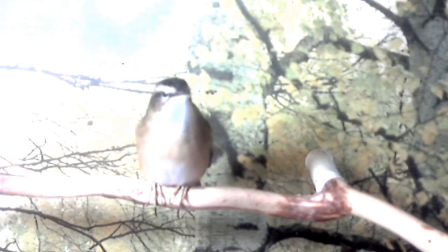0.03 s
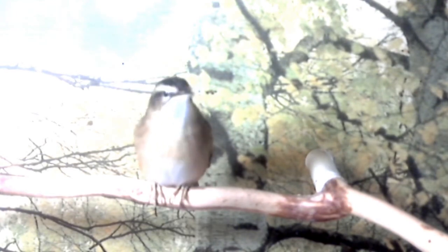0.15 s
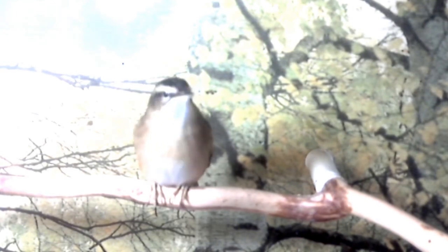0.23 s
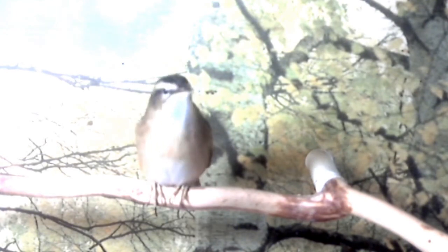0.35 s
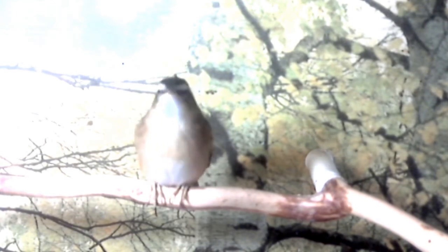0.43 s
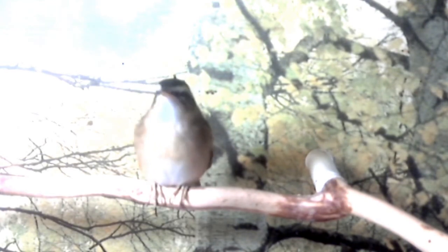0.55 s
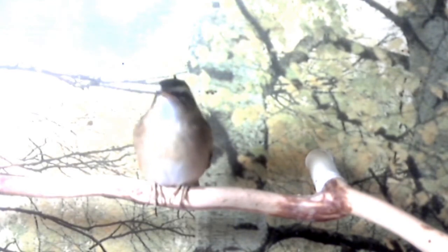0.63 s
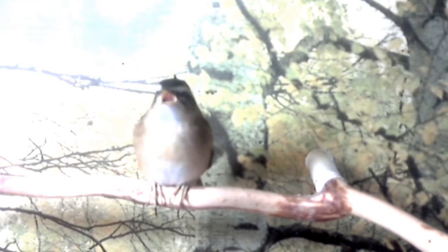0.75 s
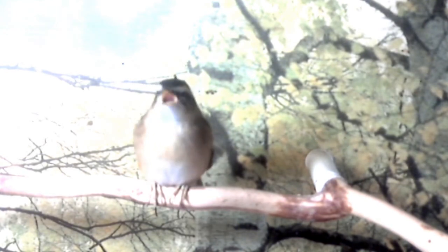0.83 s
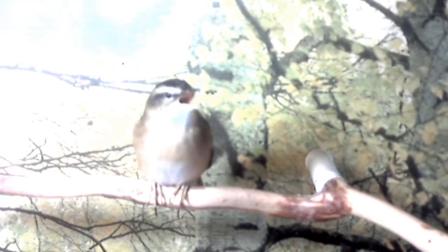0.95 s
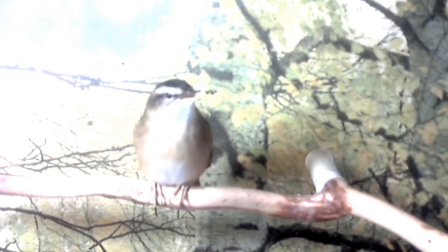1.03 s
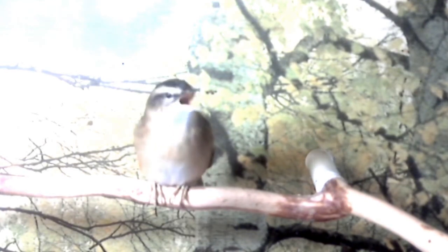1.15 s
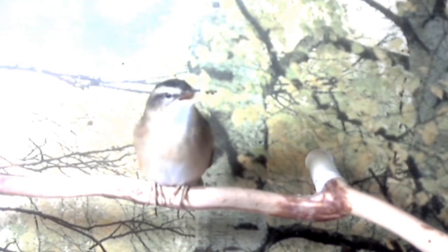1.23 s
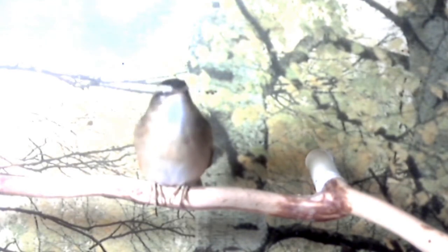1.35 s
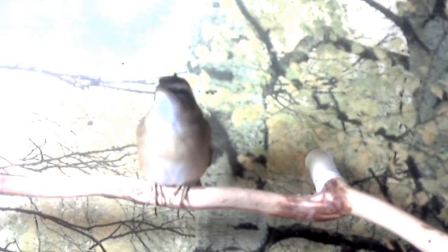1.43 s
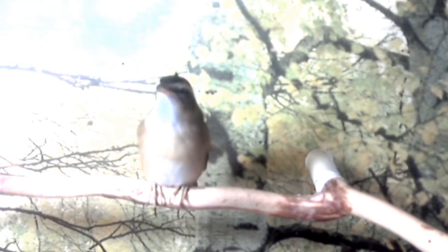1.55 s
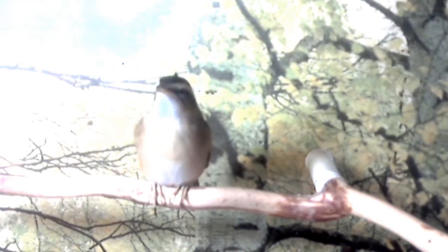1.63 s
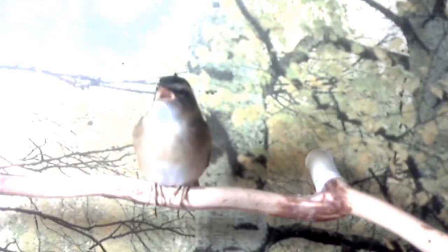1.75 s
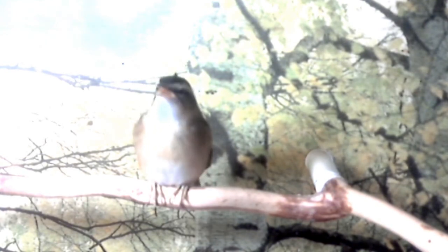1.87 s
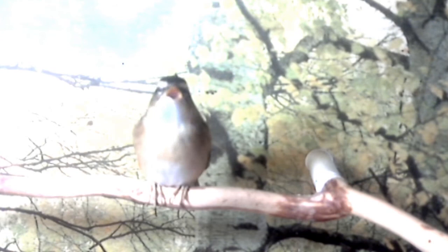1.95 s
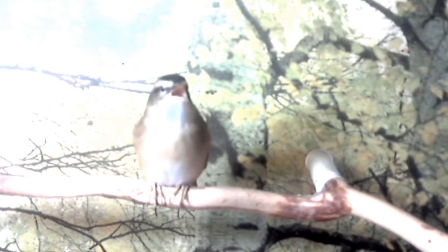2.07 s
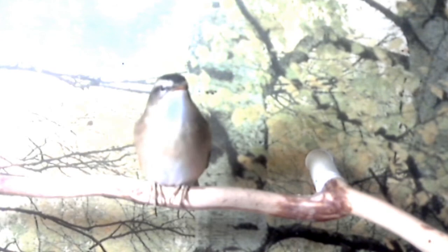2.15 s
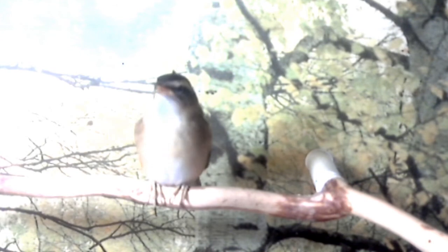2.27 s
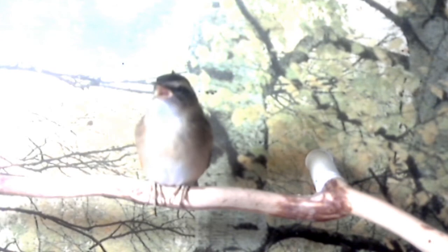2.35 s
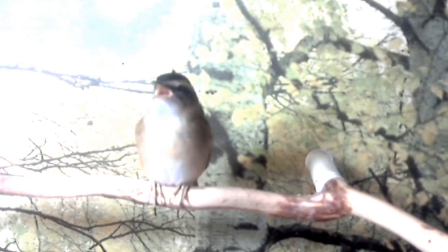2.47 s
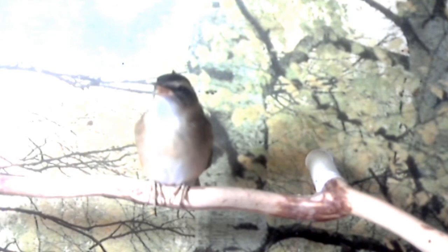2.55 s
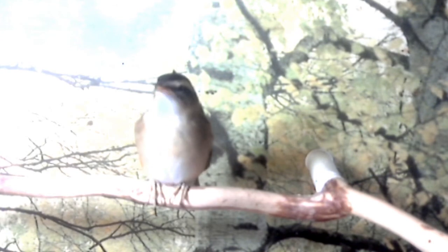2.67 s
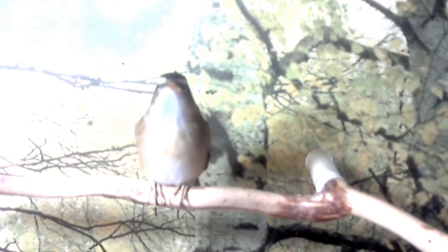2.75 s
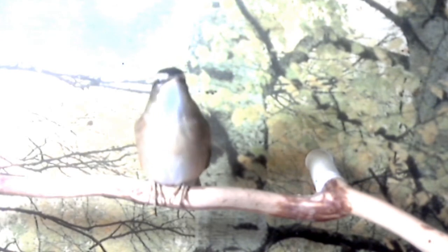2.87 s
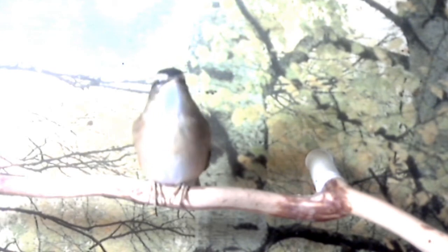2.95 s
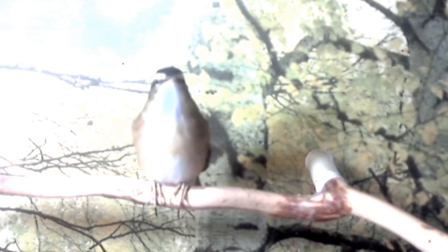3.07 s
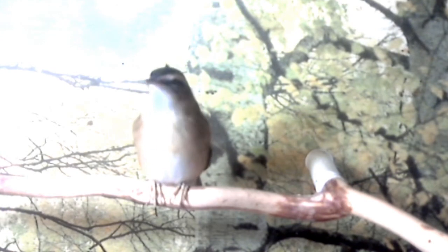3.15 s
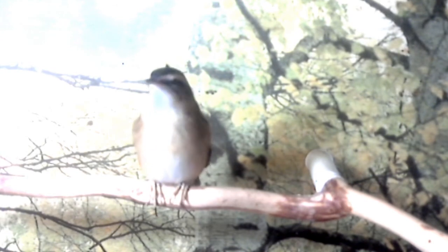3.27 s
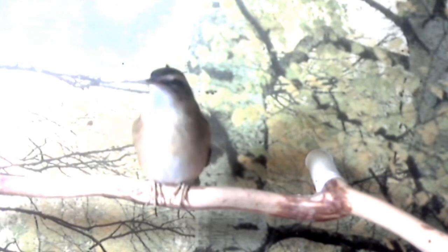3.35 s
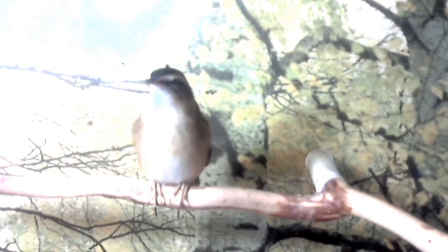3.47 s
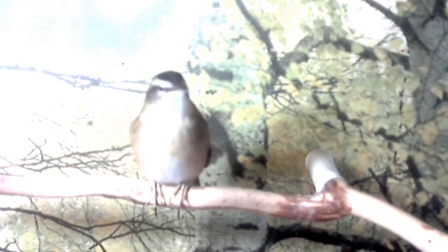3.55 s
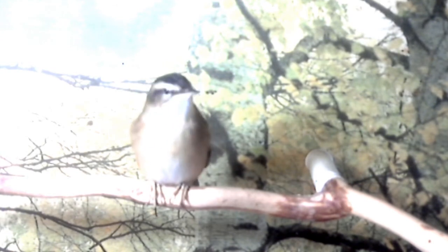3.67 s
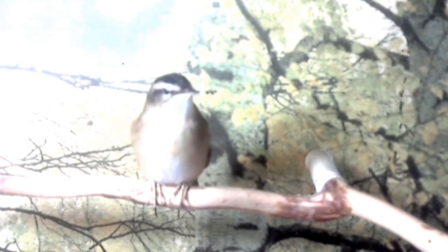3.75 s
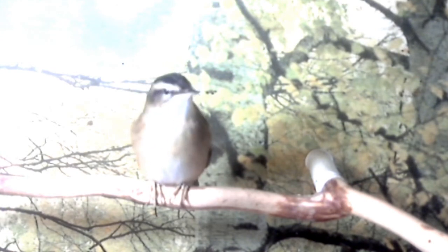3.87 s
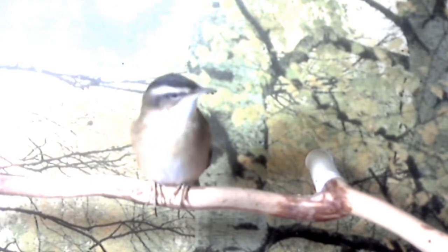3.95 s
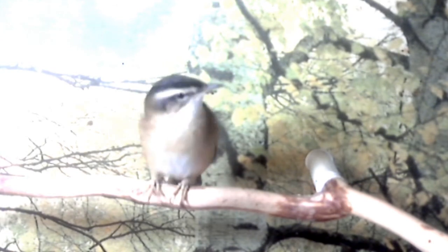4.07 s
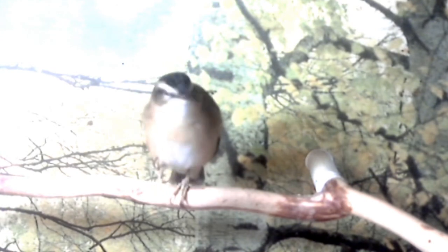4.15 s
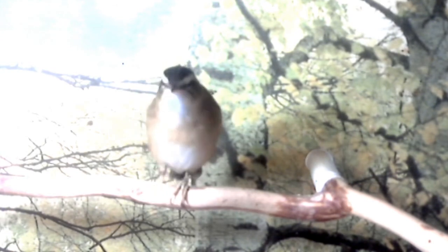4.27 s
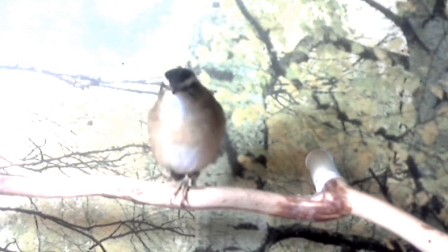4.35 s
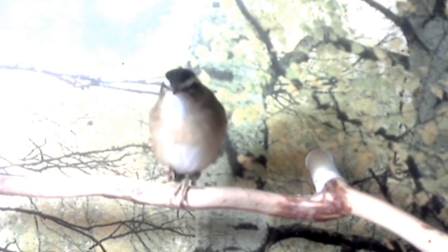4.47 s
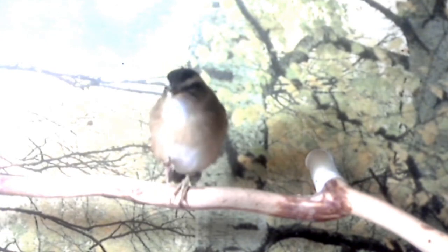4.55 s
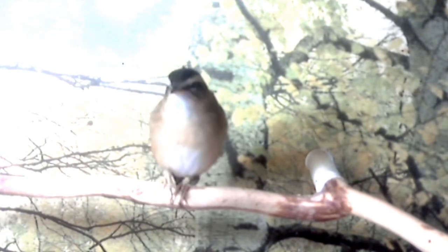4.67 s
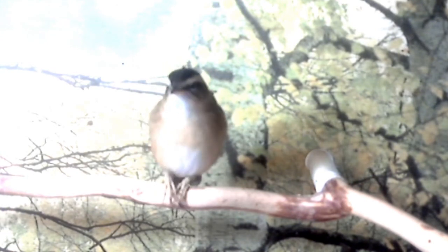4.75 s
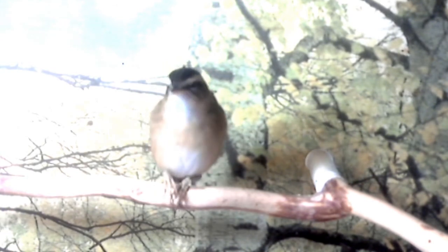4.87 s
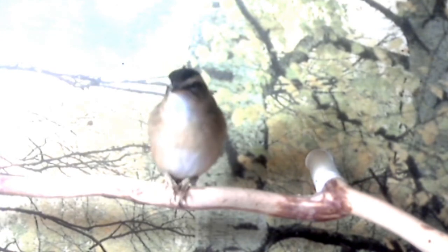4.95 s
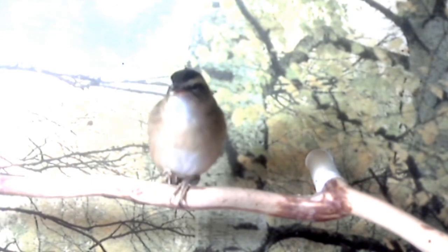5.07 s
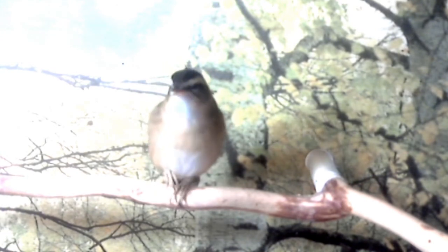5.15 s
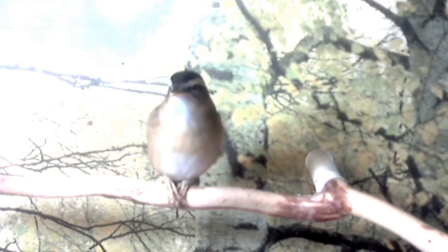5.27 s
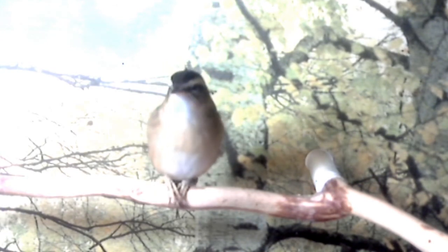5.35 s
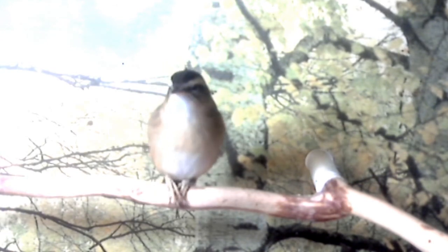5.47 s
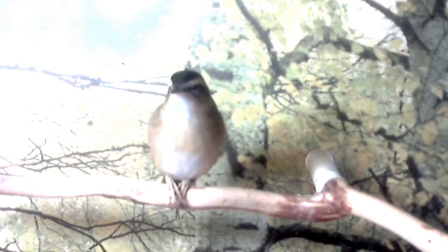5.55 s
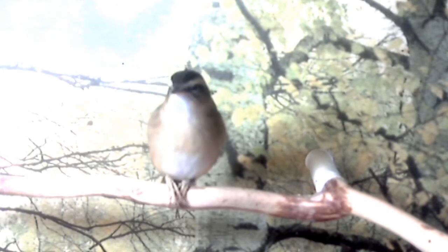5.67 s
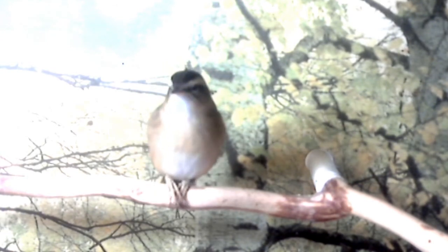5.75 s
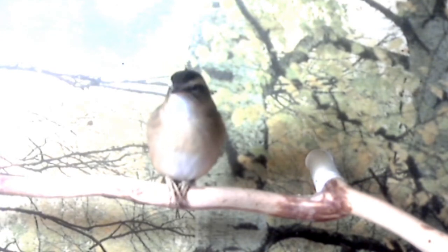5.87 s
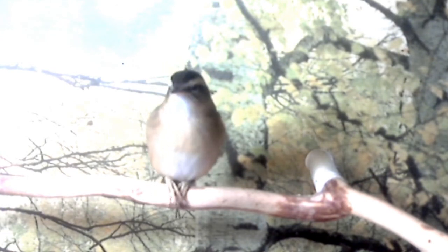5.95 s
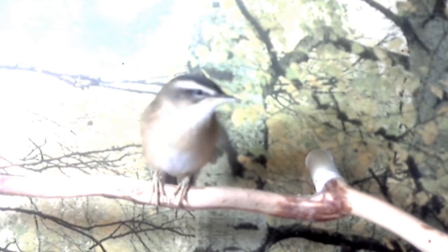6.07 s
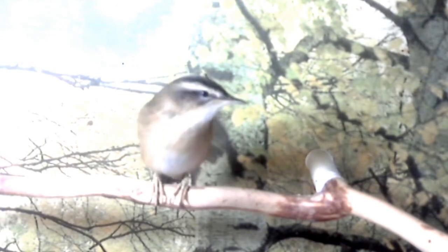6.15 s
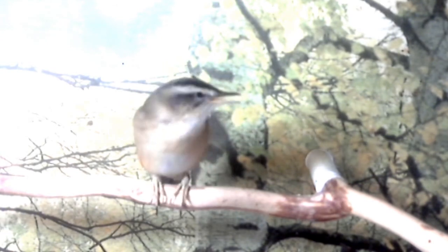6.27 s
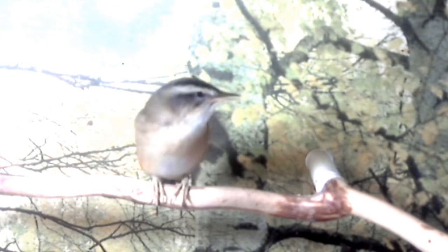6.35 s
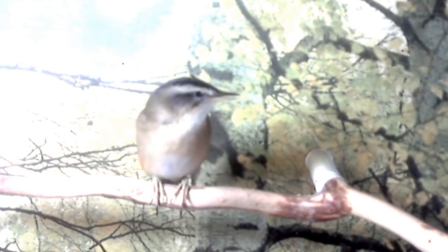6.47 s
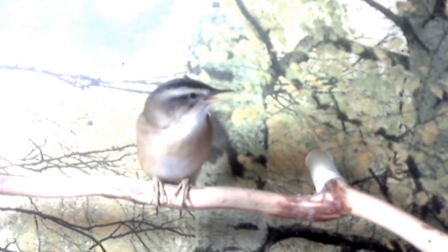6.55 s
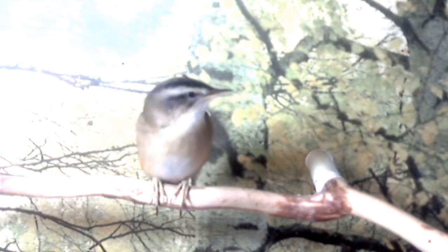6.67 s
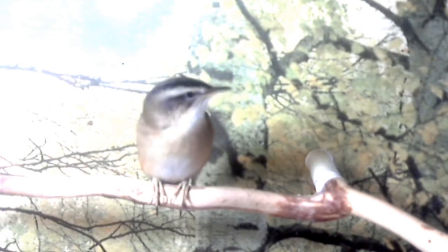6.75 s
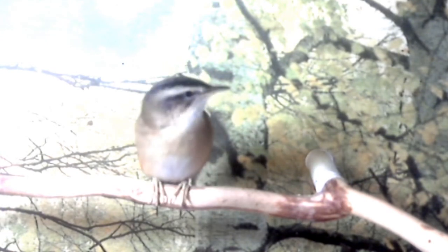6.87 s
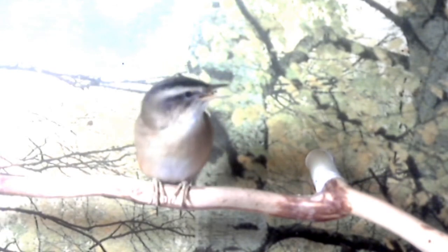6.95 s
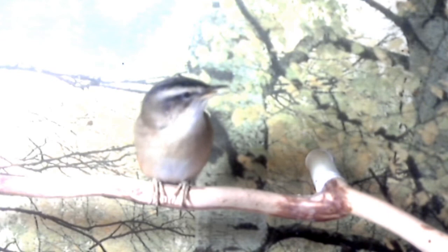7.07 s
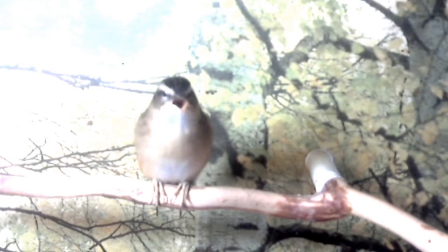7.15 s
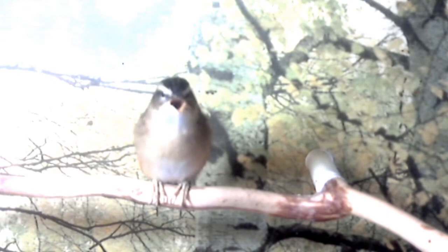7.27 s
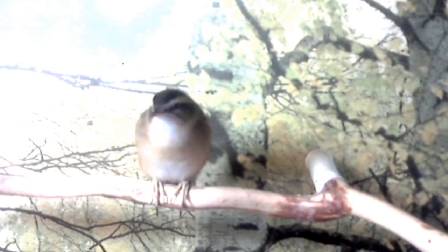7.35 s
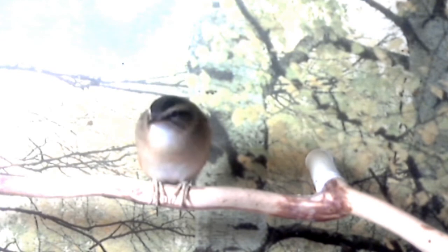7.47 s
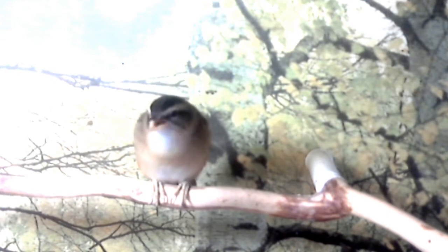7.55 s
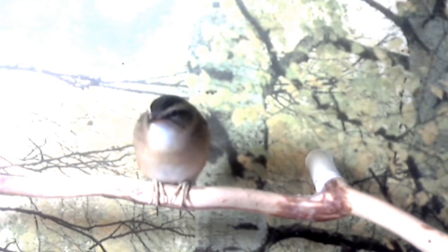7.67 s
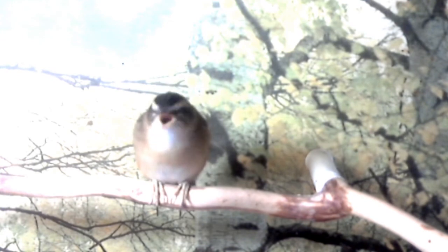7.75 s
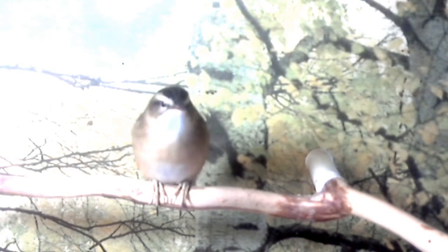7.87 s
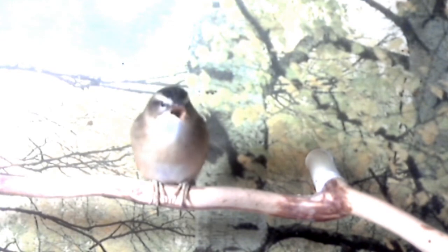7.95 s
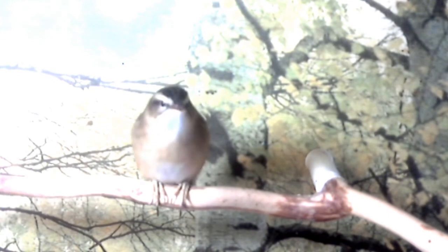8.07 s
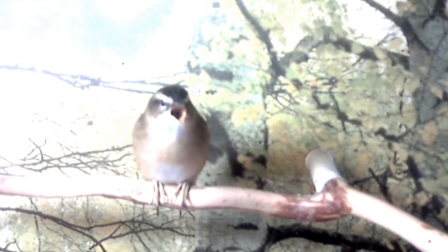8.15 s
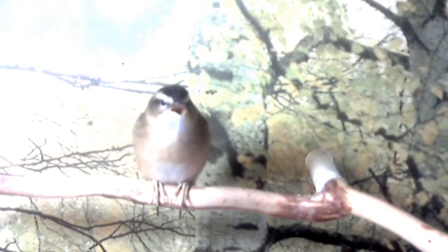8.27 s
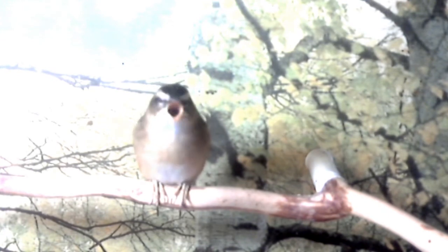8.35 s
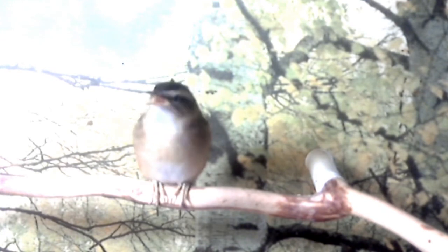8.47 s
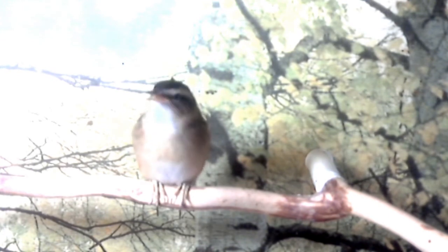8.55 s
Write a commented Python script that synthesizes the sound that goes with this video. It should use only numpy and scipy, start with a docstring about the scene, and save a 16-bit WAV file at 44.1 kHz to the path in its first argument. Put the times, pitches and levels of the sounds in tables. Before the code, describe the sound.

Close song of a warbler: fast clusters of scratchy chips, a few buzzes, loud chirps and faint whistles over quiet air.

```python
"""On a branch close to a microphone, a sedge warbler sings: clusters of short chips, three rasping
buzzes and five loud two-voiced chirps, with faint whistles, ringing tails and husky notes between them.
Its syrinx gives rough tones; windpipe and beak weight the harmonics of the chips, each in a short halo of
hiss. Foliage scatters the song for a moment, a quiet hum and air noise lie under it, and the loudest
notes overload the recorder."""
import sys
import numpy as np
from scipy import signal
from scipy.fft import rfft, irfft
from scipy.io import wavfile

SR = 44100
rng = np.random.default_rng(int(sys.argv[2]) if len(sys.argv) > 2 else 0)


def digitize_waveform(pressure):
    """Quantize a signal to 16-bit integers and store it at the path in sys.argv[1].

    Rows of a 2-D input are taken as channels; values are limited to [-1, 1].
    """
    field = np.atleast_2d(pressure).T
    bounded = np.clip(field, -1, 1)
    quanta = np.round(bounded * 32767).astype(np.int16)
    wavfile.write(sys.argv[1], SR, quanta)


N = 379701

# Spectrum of the hiss with chips, buzzes and chirps. Each row: frequency in Hz, relative density in dB.
HISS = [(700, -27.5), (1500, -11), (2600, -10), (4500, 13.5), (7000, -4), (9000, -14.5), (12000, -30)]
# Voices of the two kinds of buzz. Each row: first and last pitch in Hz, bandwidth in Hz, gain in dB.
LOW_BUZZ = [(965, 1000, 230, -31), (1390, 1504, 354, -17.5), (2887, 2850, 200, -2), (3420, 3400, 1770, -2),
            (4040, 4200, 960, -6), (5420, 3300, 3350, -11), (7400, 7500, 530, -27.5)]
HIGH_BUZZ = [(2935, 2950, 610, 0), (4320, 4300, 490, -5.5), (5680, 5650, 1260, 6), (6210, 5500, 1100, 1.5),
             (7130, 7500, 2100, -15)]


def undb(db):
    return 10 ** (np.asarray(db) / 20)


def unit_rms(x):
    return x / np.sqrt(np.mean(np.abs(x) ** 2))


def coloured_noise(points, size):
    """Spectral shaping: white noise weighted by a curve of (Hz, dB) points, at rms 1."""
    hz, db = np.transpose(points)
    shape_db = np.interp(np.log(np.fft.rfftfreq(size, 1 / SR) + 1), np.log(hz), db)
    return unit_rms(irfft(rfft(rng.standard_normal(size)) * undb(shape_db), size))


def waver(width_hz, size):
    """Narrow-band noise: a complex signal of rms 1 with a Gaussian spectrum around 0 Hz."""
    hz = np.fft.fftfreq(size, 1 / SR)
    white = rng.standard_normal(size) + 1j * rng.standard_normal(size)
    return unit_rms(np.fft.ifft(white * np.exp(-4 * (hz / width_hz) ** 2)))


def voice(hz0, hz1, width_hz, size, clear):
    """Random modulation spreads a gliding tone over a band; the share `clear` of its power stays pure."""
    phase = 2 * np.pi * (np.cumsum(np.linspace(hz0, hz1, size)) / SR + rng.random())
    amplitude = np.sqrt(clear) + np.sqrt(1 - clear) * waver(width_hz, size)
    return np.sqrt(2) * np.real(amplitude * np.exp(1j * phase))


def add(out, sound, start_s):
    """Superposition: a sound joins the mix at its start time."""
    i = int(round(start_s * SR))
    part = sound[max(-i, 0):N - i]
    out[max(i, 0):max(i, 0) + len(part)] += part


def hum():
    """Steady sinusoids of random phase superpose into a quiet hum."""
    # Each row: frequency in Hz, level in dB.
    partials = [(339.1, -79.5), (387.6, -90.5), (436.0, -72), (629.8, -87.5)]
    t = np.arange(N) / SR
    return sum(np.sqrt(2) * undb(db) * np.sin(2 * np.pi * (hz * t + rng.random())) for hz, db in partials)


def air():
    """Slow random amplitude modulation makes soft broadband noise flicker."""
    # Each row: frequency in Hz, relative density in dB.
    spectrum = [(24, -55), (40, -11.5), (435, -20.5), (1160, -24), (2480, -20), (3820, -10.5),
                (5860, -19.5), (12000, -50), (15600, -89.5), (22000, -120)]
    level_db = -65.5 + 1.9 * np.real(waver(6.7, N))
    return undb(level_db) * coloured_noise(spectrum, N)


def soft_note(length_s, hz0, hz1, width_hz, clear):
    """Amplitude modulation near 55 Hz flutters a hoarse tone, which swells and fades in 2 * length_s."""
    size = int(2 * length_s * SR)
    u = np.linspace(-2, 2, size)  # the note proper runs from -1 to 1
    overshoot_hz = (hz1 - hz0) / 2
    core = voice(hz0 - overshoot_hz, hz1 + overshoot_hz, width_hz, size, clear)
    fringe = undb(-10) * voice(hz0, hz1, width_hz + 1500, size, clear=0)
    flutter = 1 + 0.19 * np.real(waver(34, size) * np.exp(2j * np.pi * 55 * np.arange(size) / SR))
    envelope = np.exp(-np.where(u < 0, 0.4 * u ** 4, 0.45 * u ** 2)) * signal.windows.tukey(size, .2)
    return envelope * flutter * (core + fringe)


def whistles_and_tails():
    """Narrow noise bands carry a pitch: faint whistles, and ringing tails after chips and buzzes."""
    # Each row: start in seconds, length in seconds, first and last pitch in Hz, level in dB.
    notes = [(0, 0.11, 7080, 7200, -46), (0.157, .16, 7000, 6940, -41.5), (0.315, 0.049, 3310, 3200, -22.5),
             (0.431, 0.076, 6960, 7300, -44), (0.502, 0.1, 4160, 4830, -47.5),
             (0.584, 0.098, 2870, 2685, -34), (0.81, 0.094, 4100, 3830, -25.5),
             (1.331, 0.1, 2880, 3260, -59), (1.337, 0.087, 1760, 1740, -68.5),
             (1.76, 0.076, 2510, 2360, -45.5), (2.547, 0.069, 6185, 6000, -36.5),
             (2.569, 0.077, 3970, 3900, -40), (3.367, 0.077, 1554, 1510, -61.5),
             (3.416, 0.13, 8200, 8100, -59), (3.808, 0.06, 4240, 4430, -44),
             (3.815, 0.051, 4780, 4970, -43.5), (3.993, 0.1, 5040, 4860, -42.5),
             (4.015, 0.12, 3340, 3310, -56), (4.128, 0.042, 1230, 1150, -66),
             (4.204, 0.082, 2650, 2740, -43.5), (4.39, 0.094, 3425, 3356, -32.5),
             (4.512, 0.15, 6000, 6200, -50), (4.695, 0.16, 4244, 4400, -32.5),
             (4.703, .2, 2750, 2700, -39.5), (4.714, 0.15, 5330, 5770, -39.5),
             (5.426, 0.054, 3100, 3050, -47.5), (5.69, 0.093, 3340, 3370, -53.5),
             (5.919, 0.069, 4110, 4240, -44.5), (5.96, 0.046, 2120, 2000, -68),
             (5.998, 0.061, 3115, 3060, -44), (6.038, 0.11, 3660, 4170, -41.5),
             (6.206, 0.078, 3470, 3370, -41), (6.517, 0.085, 3300, 3490, -37.5),
             (6.636, 0.052, 6373, 6500, -40), (6.649, 0.063, 3880, 3930, -40.5),
             (6.818, 0.088, 3874, 4530, -38.5), (6.862, 0.069, 4880, 4810, -40),
             (6.883, 0.073, 1508, 1524, -53.5), (7.432, 0.057, 5000, 5000, -36),
             (7.509, 0.068, 5970, 5740, -34.5), (7.657, 0.064, 3950, 4154, -38.5),
             (7.773, 0.038, 2850, 3022, -47.5), (7.919, 0.098, 6756, 6160, -33.5),
             (8.099, 0.082, 6633, 6144, -43), (8.27, 0.11, 6460, 6400, -36),
             (8.467, 0.051, 6744, 6450, -30)]
    out = np.zeros(N)
    for start, length, hz0, hz1, db in notes:
        add(out, undb(db) * soft_note(length, hz0, hz1, width_hz=380, clear=.1), start - length / 2)
    return out


def husky_notes(length_s=0.052):
    """A wide noise band with no pure tone has only a vague pitch and sounds husky."""
    # Each row: start in seconds, centre frequency in Hz, bandwidth in Hz, level in dB.
    notes = [(0, 3730, 815, -35), (0.16, 3660, 940, -29.5), (.25, 4900, 2640, -45),
             (1.052, 6130, 892.7, -39.5), (3.155, 2160, 1460, -47.5), (3.335, 5110, 2600, -50.5),
             (3.519, 1253, 1210, -57), (3.657, 1117, 1020, -62), (3.702, 7720, 2490, -44),
             (4.041, 4130, 1700, -35), (4.215, 3590, 610, -39), (4.371, 6050, 1179, -49),
             (4.507, 7500, 900, -44.5), (4.551, 4350, 650, -32), (4.7, 8300, 2030, -46),
             (4.761, 1190, 900, -53), (4.1, 3740, 1212, -49.5), (3.399, 3210, 1500, -62),
             (6.14, 6400, 2500, -52.5), (8.301, 2570, 1200, -50.5), (5.603, 1330, 1410, -59),
             (5.681, 4840, 1500, -38), (5.73, 6800, 1190, -51), (5.76, 8500, 1000, -47),
             (5.845, 5580, 2800, -39), (5.851, 2800, 1180, -54), (6.098, 6700, 2700, -47.5),
             (6.18, 7660, 720, -49), (6.282, 5830, 2260, -35), (6.478, 7835, 1005, -39.5),
             (8.46, 5302, 700.4, -40), (8.515, 1837, 609.5, -52)]
    out = np.zeros(N)
    for start, hz, width_hz, db in notes:
        add(out, undb(db) * soft_note(length_s, hz, hz, width_hz, clear=0), start - length_s / 2)
    return out


def chips():
    """Source and filter: windpipe and beak weight a chip's harmonics; it has a rasp and a halo of hiss."""
    # Each row: middle in seconds, length at half amplitude in ms, level in dB, pitch in Hz, frequency
    # favoured by the beak in Hz, fall away from it in dB per kHz, rasp relative to the level in dB.
    notes = [(0.084, 12.7, -18, 915, 3600, 4.6, -4), (0.115, 12, -15, 1470, 3000, 8.5, -9),
             (0.148, 11.6, -15, 1418, 2820, 8, -13), (0.371, 8.5, -15.5, 893, 3500, 5.5, -6.7),
             (0.402, 12.6, -15.5, 929, 3440, 6.5, -6.4), (0.436, 12, -18, 878, 3430, 7, -5),
             (0.6, 12, -17, 904, 3400, 10, -10), (0.754, 12, -21.5, 1274, 5500, 4.5, -6.5),
             (0.781, 7.5, -22, 1348, 5970, 5, -0.5), (0.807, 8.7, -20, 744, 6500, 6, -7),
             (0.838, 11, -21.5, 1016, 5110, 6, -5), (0.869, 13, -21, 1362, 5240, 4, -11),
             (0.902, 11, -16, 1372, 5100, 7, -2), (0.934, 9.5, -14, 1388, 5140, 6, -19),
             (0.965, 10.4, -22, 1252, 5430, 5.5, -12), (0.998, 11.2, -18, 1359, 5800, 4.5, -6.3),
             (1.038, 12, -29, 1393, 5576, 9.5, -2.5), (1.187, 9.7, -21.5, 1349, 5800, 5, 2.5),
             (1.213, 10, -14.5, 1392, 4380, 4.5, -15), (1.239, 10, -14.5, 1388, 5630, 5, -5),
             (1.273, 3.8, -22, 1374, 5300, 4.7, -0.5), (2.655, 7.9, -19.3, 1365, 4330, 12, -4),
             (2.677, 9.8, -23, 917, 4000, 2.8, 0.5), (2.826, 9.0, -23, 855.4, 4220, 3.5, 9),
             (2.836, 13, -12.5, 925, 3650, 6.5, -12.9), (2.869, 9.8, -9, 1403, 2790, 8.5, -12.5),
             (2.919, 10, -12.5, 1407, 2790, 14.5, -25.5), (3.125, 10, -13.5, 936.7, 3010, 7, -6),
             (3.155, 7.7, -13, 1440, 2857, 9, -21.5), (4.306, 11, -17, 950.3, 3770, 5, -6),
             (4.338, 6, -15.5, 1438, 2863, 14, -8), (4.355, 6, -16, 1575, 3150, 15, -14.5),
             (4.648, 14, -25, 952, 2870, 2.5, 5.5), (4.682, 9.2, -21, 1227, 3430, 7.5, -4),
             (4.905, 12.4, -21, 1177, 3460, 7, -1), (4.943, 11.4, -19.5, 923, 2770, 7.5, -11),
             (6.387, 6.1, -18, 953, 3900, 4, -7.5), (6.421, 8.7, -10.5, 1051, 3260, 9, -13),
             (6.455, 5.6, -21.5, 872, 3280, 6.5, -7), (6.601, 8.8, -22.5, 1357, 3850, 5.5, -4),
             (6.624, 10.3, -14.5, 1350, 4220, 7, -11.5), (6.764, 11.4, -25.5, 1362, 5360, 2.5, -5),
             (6.788, 7, -17.5, 1351, 3900, 8.5, -8.5), (6.983, 9.1, -22.5, 1177, 3440, 24, -4),
             (7.003, 10.7, -23, 1274, 4000, 4.0, -6.5), (7.018, 5.43, -23.5, 1286, 3901, 19, -16),
             (7.613, 9.8, -21.5, 1237, 3780, 10, -16), (7.638, 11, -25, 1321, 3920, 4.5, -1.5),
             (7.832, 7.36, -17.5, 746.6, 5960, 3.5, 0.6), (7.861, 10.3, -14, 745.5, 5950, 4.5, -11.5),
             (7.886, 7, -17, 741, 5973, 3.5, -10), (8.03, 3.6, -18.5, 778.7, 4725, 2.5, 1.5),
             (8.052, 11.5, -16.5, 766, 4870, 4, -19), (8.076, 7.6, -16, 766, 6100, 4.5, -4.5),
             (8.205, 8.3, -18.5, 791, 6220, 2.5, -2.5), (8.228, 14.4, -14.5, 789, 4903, 3, -11),
             (8.249, 9.8, -5.5, 1628, 6423, 6, -10), (8.272, 8.37, -23, 1630, 6560, 7.7, -10.9),
             (8.385, 10, -14, 780, 6050, 6, -15), (8.397, 13.2, -11, 1621, 6400, 2.5, -8.5),
             (8.418, 11.4, -4, 1629, 6520, 6, -9), (8.45, 11.7, -10.5, 854, 6728, 3, -8),
             (8.553, 13, -26, 1442, 4330, 7, 0.5)]
    # The windpipe's colour on the harmonics. Each row: frequency in Hz, gain in dB.
    windpipe = [(1200, -26.5), (1900, -10.5), (2400, -9.5), (2800, -0.5), (3250, -1.5), (3700, 1),
                (5500, 2), (6500, 1.5), (7300, -2.5), (8200, -6.5)]
    # The throat's rasp bands. Each row: centre frequency in Hz, gain in dB.
    throat_bands = [(1350, -36), (1900, -27), (2780, -13.5), (3700, -12), (5480, -13), (6500, -17.5),
                    (7420, -15), (8150, -30.5)]
    out, size = np.zeros(N), 8192
    t = (np.arange(size) - size / 2) / SR
    bend = 0.4 * t[-1]  # the pitch climbs at 40 % a second
    halo = np.exp(-(t / np.where(t < 0, 0.021, 0.03)) ** 2)  # begins before the chip and lingers after
    for middle, length_ms, level_db, pitch_hz, beak_hz, fall_db_per_khz, rasp_db in notes:
        burst = np.exp(-2.8 * (1000 * t / length_ms) ** 2)
        sound = undb(level_db + rasp_db - 8) * halo * coloured_noise(HISS, size)
        for k in range(1, 12):
            hz = k * pitch_hz
            if 1100 < hz < 8177:
                db = level_db - fall_db_per_khz * abs(hz - beak_hz) / 1000
                db += np.interp(hz, *np.transpose(windpipe))
                if k % 2 and pitch_hz < 860:  # period doubling: strong and weak cycles alternate
                    db -= 5.5
                sound += undb(db) * burst * voice((1 - bend) * hz, (1 + bend) * hz, 201, size, clear=.96)
                # a raspier chip has a stronger husky halo around its harmonics
                sound += undb(db - 6.5 + 0.5 * rasp_db) * halo * voice(hz, hz, 610, size, clear=0)
        for band_hz, band_db in throat_bands:
            hz = band_hz * (1 + 0.013 * rng.standard_normal())
            db = level_db + rasp_db + band_db + 2.5 * rng.standard_normal()
            sound += undb(db) * burst * voice(hz, hz, 350, size, clear=0.56)
        add(out, sound, middle + t[0])
    return out


def churr(start, middle, half, level_db, voices, squareness, throb_hz, throb, hiss_db):
    """Common modulation: rough voices swell and fade as one and throb as the syrinx flutters."""
    out, t = np.zeros(N), np.arange(start, middle + 2 * half, 1 / SR)
    size = len(t)
    stretch = size / SR / (middle + half - start)  # glides reach their last pitch at middle + half
    tones = sum(undb(db) * voice(hz0, hz0 + (hz1 - hz0) * stretch, width_hz, size, clear=.08)
                for hz0, hz1, width_hz, db in voices)
    sound = unit_rms(tones) + undb(hiss_db) * coloured_noise(HISS, size)
    flutter = 1 + throb * np.real((0.13 + 0.16 * waver(31, size)) * np.exp(2j * np.pi * throb_hz * t))
    swell = undb(level_db - 17.5 * np.abs((t - middle) / half) ** squareness)
    onset = np.minimum((t - start) / 0.012, 1)
    add(out, unit_rms(sound * flutter) * swell * onset, start)
    return out


def buzzes():
    """Many overlapping noise bands under one envelope fuse into a rasp."""
    # Each row: start, middle and half length in seconds, level in dB, squareness of the swell,
    # throb rate in Hz, throb strength, voices.
    notes = [(1.409, 1.528, 0.12, -15.5, 5.3, 85, 0.2, LOW_BUZZ),
             (5.129, 5.265, .14, -19.5, 7.2, 56, 0.3, LOW_BUZZ),
             (7.104, 7.282, .12, -12.5, 2.45, 110, 0, HIGH_BUZZ)]
    return sum(churr(start, middle, half, db, voices, squareness, throb_hz, throb, hiss_db=-16)
               for start, middle, half, db, squareness, throb_hz, throb, voices in notes)


def chirps(core_hz=400, fringe_hz=970, fringe_db=-3.5):
    """Biphonation: two voices glide at once, each with a hoarse fringe, the lower with its octave."""
    # Each row: start, middle and half length in seconds, level in dB, first and last pitch in Hz of the
    # upper voice, then of the lower, levels of the lower voice and its octave in dB against the upper.
    notes = [(1.761, 1.829, 0.057, -7, 4103, 4604, 3603, 3556, -5, -13.5),
             (1.925, 1.988, .065, -8.5, 5544, 5576, 4950, 4300, -1.5, -35.5),
             (2.083, 2.135, 0.068, -7, 5510, 5526, 5010, 4200, -1.5, -32.5),
             (2.221, 2.286, .065, -8, 5470, 5120, 4620, 4150, -1, -34),
             (2.407, 2.474, 0.072, -8.5, 4510, 3905, 3500, 3083, -12, -10)]
    out = np.zeros(N)
    for start, middle, half, db, up0, up1, low0, low1, low_db, octave_db in notes:
        voices = [(up0, up1, core_hz, 0), (low0, low1, core_hz, low_db),
                  (up0, up1, fringe_hz, fringe_db), (low0, low1, fringe_hz, low_db + fringe_db),
                  (2 * low0, 2 * low1, fringe_hz, octave_db)]
        out += churr(start, middle, half, db, voices,
                     squareness=1.7, throb_hz=200, throb=0.75, hiss_db=-23.5)
    return out


def foliage(song, t60_s=.21, level_db=-15):
    """Scattering: many weak reflections from leaves form an exponentially decaying tail."""
    t = np.arange(int(.5 * SR)) / SR
    response = rng.standard_normal(len(t)) * np.exp(-np.log(1000) * t / t60_s)
    response /= np.sqrt(np.sum(response ** 2))
    return signal.fftconvolve(song, undb(level_db) * response)[:N]


def scene():
    """Direct song, scattered song, hum and air superpose in one channel."""
    song = whistles_and_tails() + husky_notes() + chips() + buzzes() + chirps()
    return (song + foliage(song) + hum() + air())[None]


def record(dry):
    """Asymmetric saturation: the input stage flattens loud peaks; filters then cut bass and top."""
    ceiling, knee = np.where(dry > 0, .5, .46), 5
    saturated = dry / (1 + np.abs(dry / ceiling) ** knee) ** (1 / knee)
    bass_cut = signal.butter(2, 110, "high", fs=SR, output="sos")
    top_cut = signal.ellip(10, .2, 80, 15850, fs=SR, output="sos")
    return signal.sosfilt(top_cut, signal.sosfilt(bass_cut, saturated))


dry = scene()
out = record(dry)
digitize_waveform(out)
```